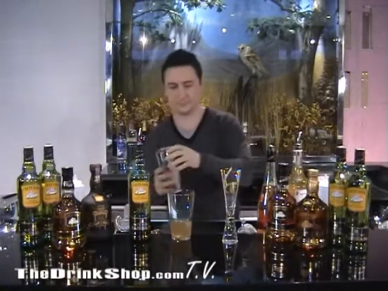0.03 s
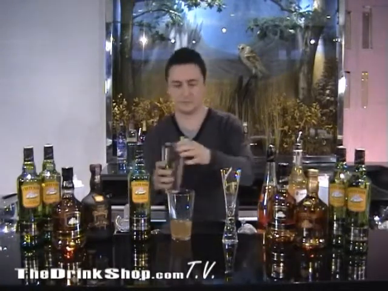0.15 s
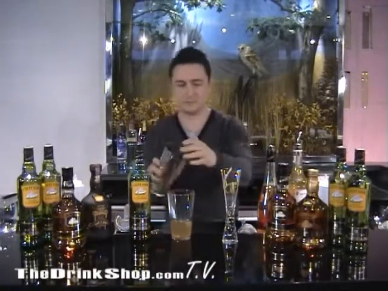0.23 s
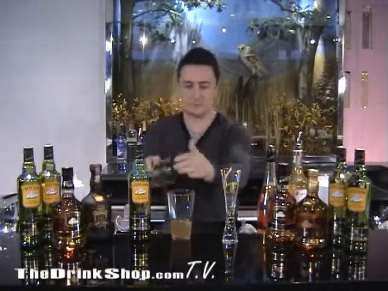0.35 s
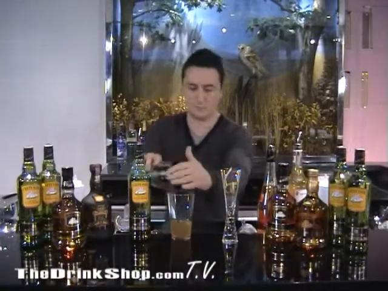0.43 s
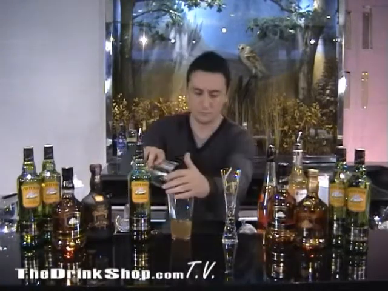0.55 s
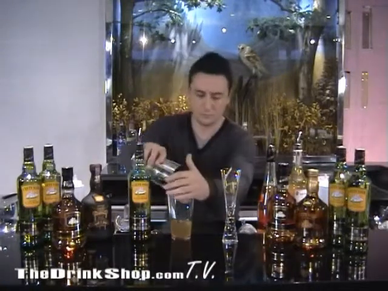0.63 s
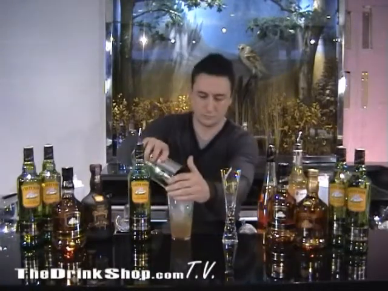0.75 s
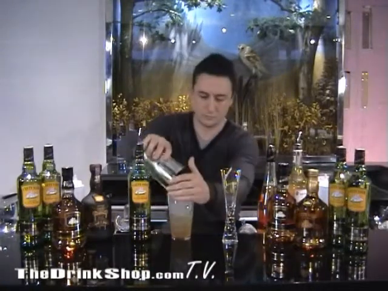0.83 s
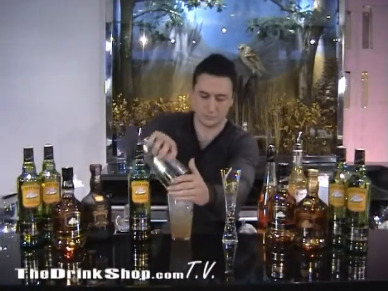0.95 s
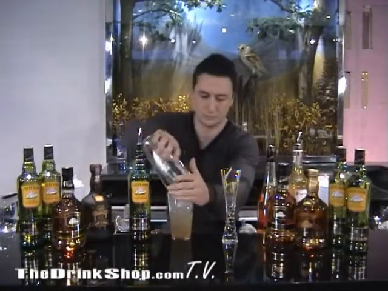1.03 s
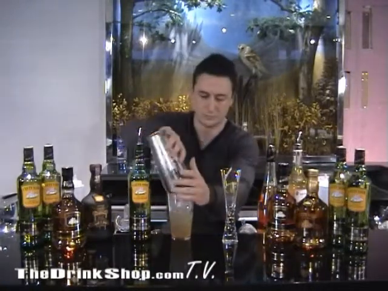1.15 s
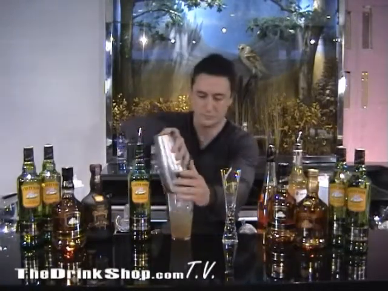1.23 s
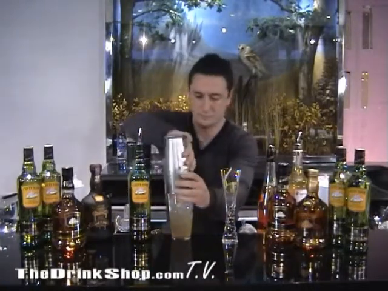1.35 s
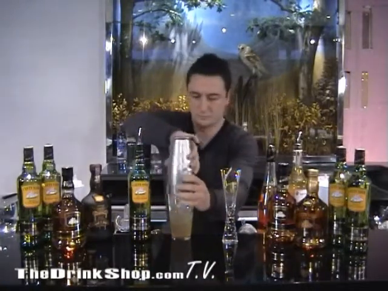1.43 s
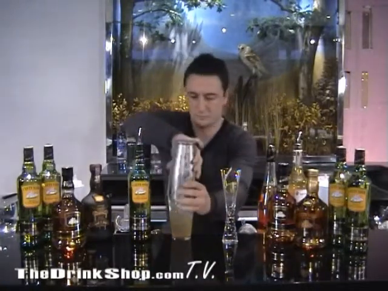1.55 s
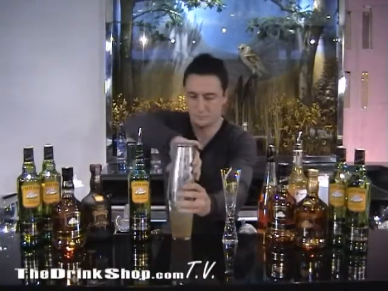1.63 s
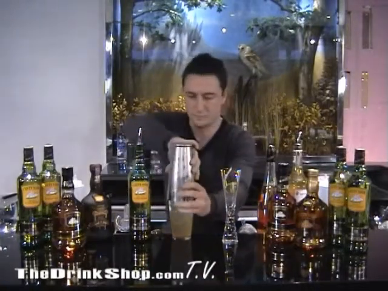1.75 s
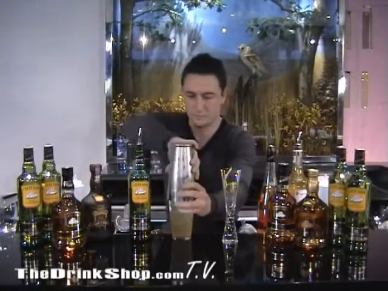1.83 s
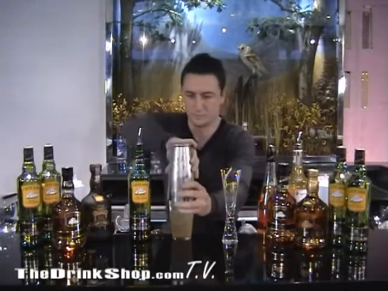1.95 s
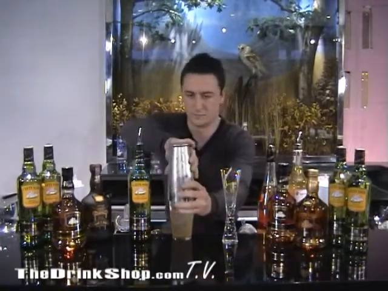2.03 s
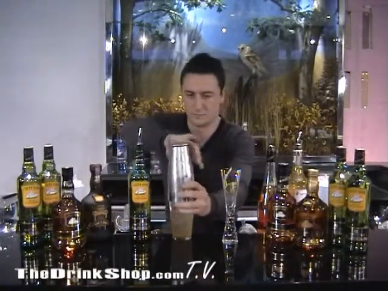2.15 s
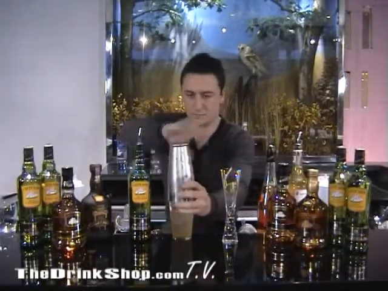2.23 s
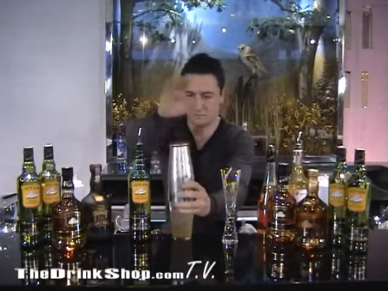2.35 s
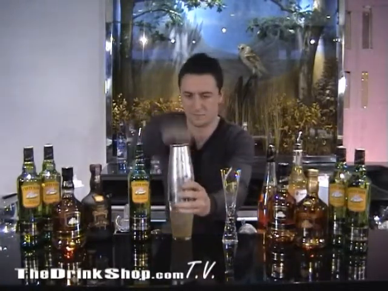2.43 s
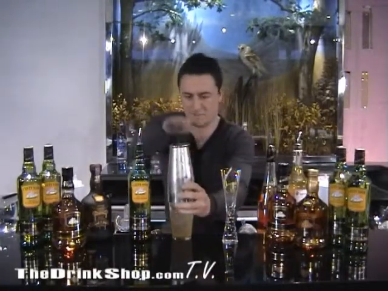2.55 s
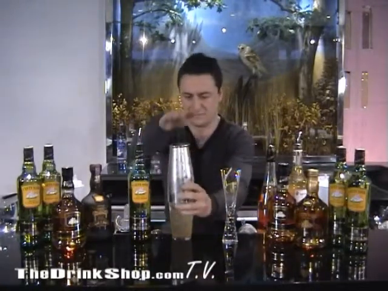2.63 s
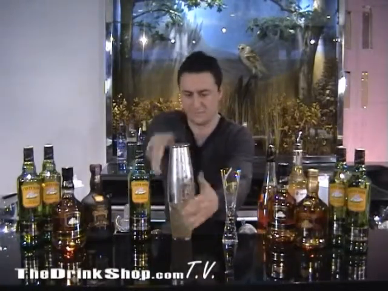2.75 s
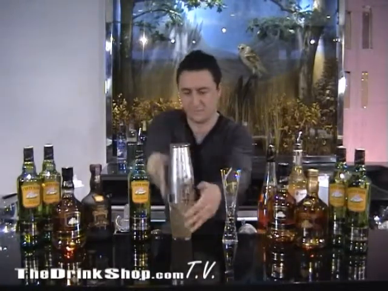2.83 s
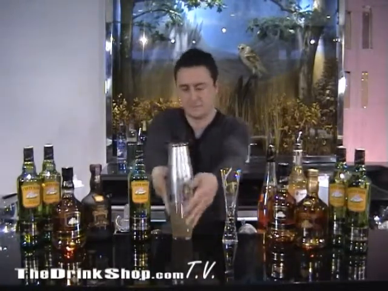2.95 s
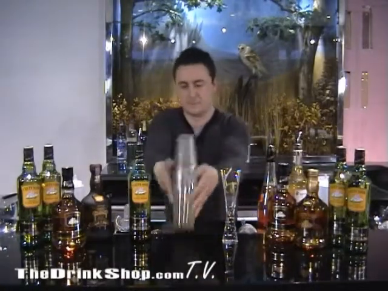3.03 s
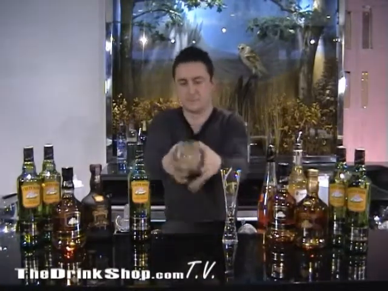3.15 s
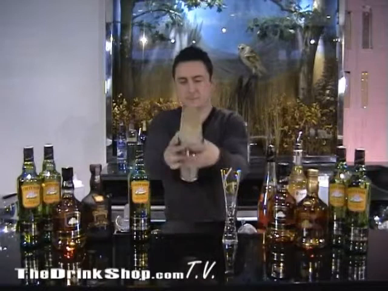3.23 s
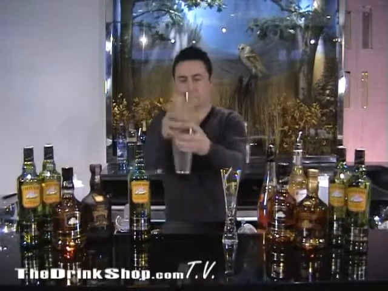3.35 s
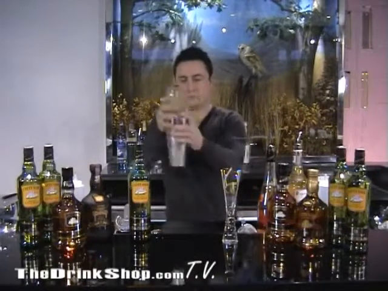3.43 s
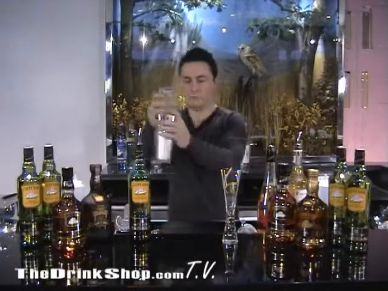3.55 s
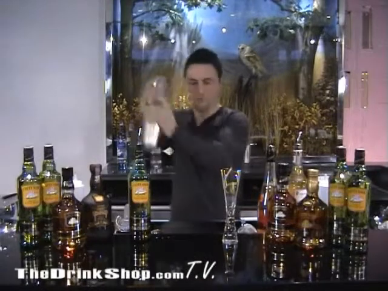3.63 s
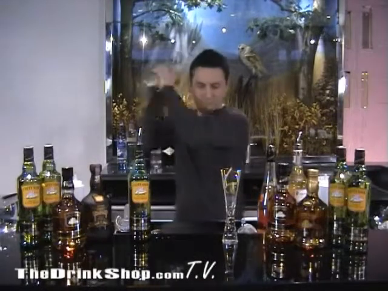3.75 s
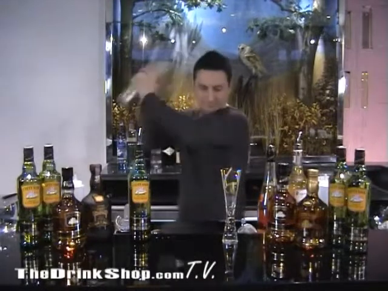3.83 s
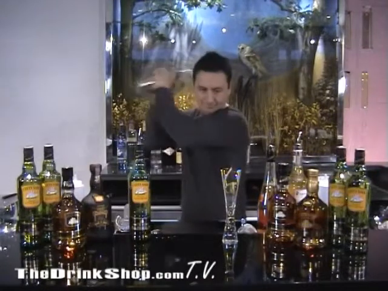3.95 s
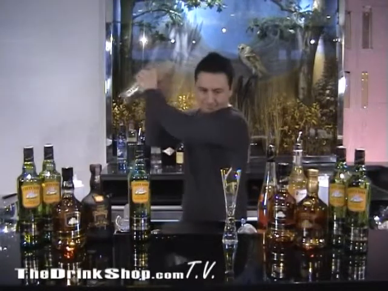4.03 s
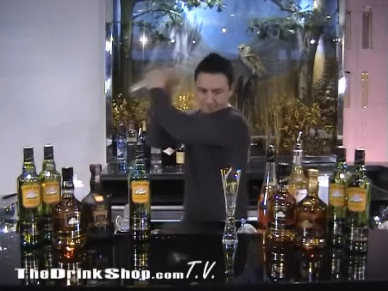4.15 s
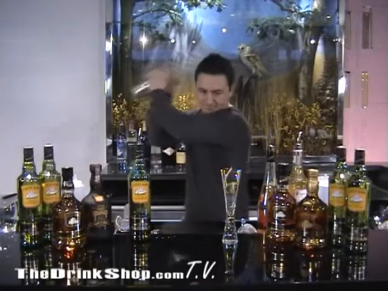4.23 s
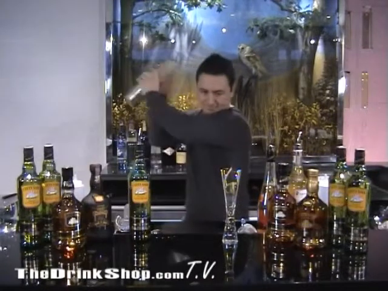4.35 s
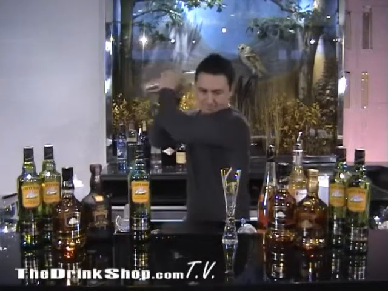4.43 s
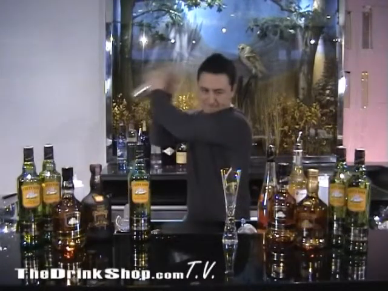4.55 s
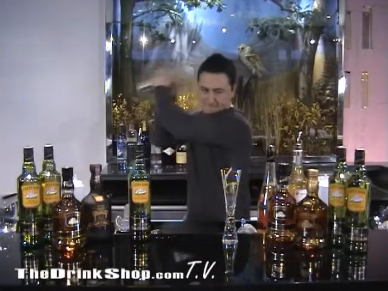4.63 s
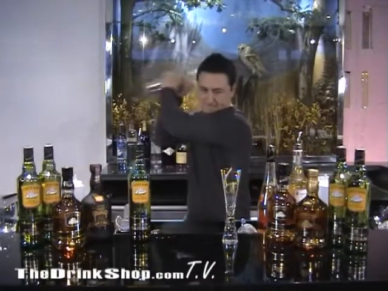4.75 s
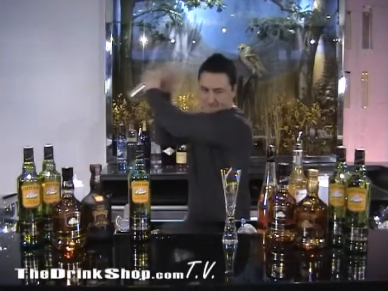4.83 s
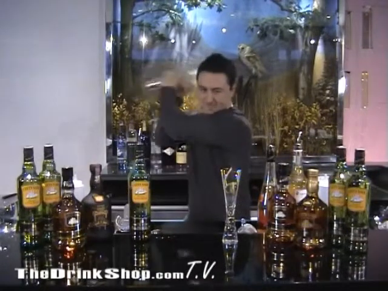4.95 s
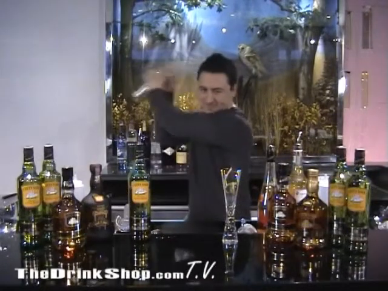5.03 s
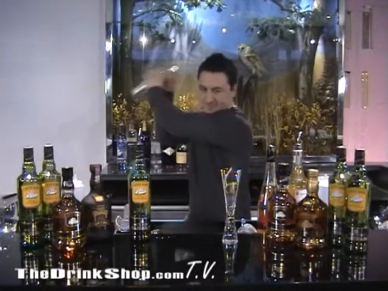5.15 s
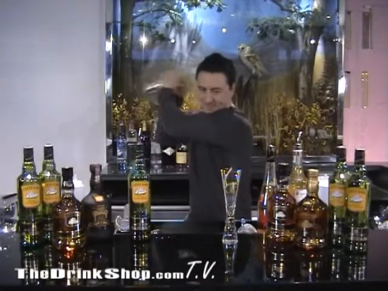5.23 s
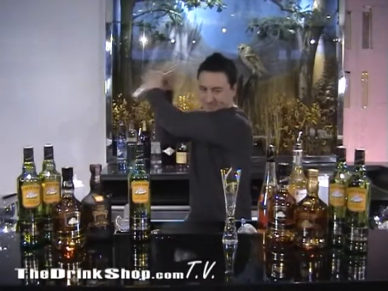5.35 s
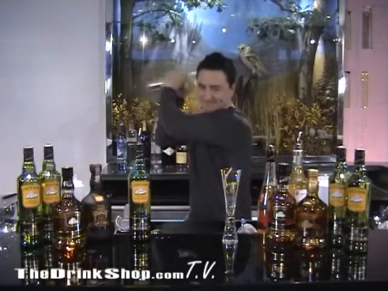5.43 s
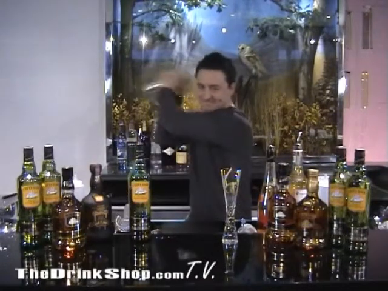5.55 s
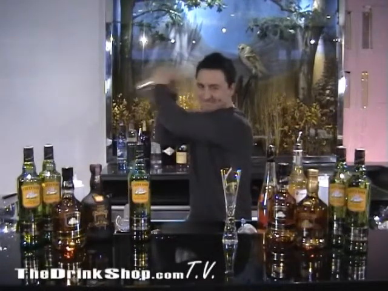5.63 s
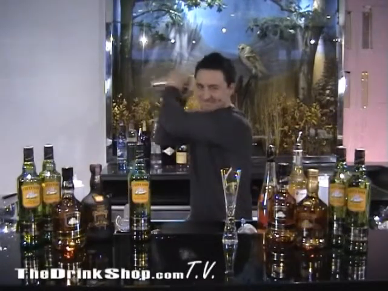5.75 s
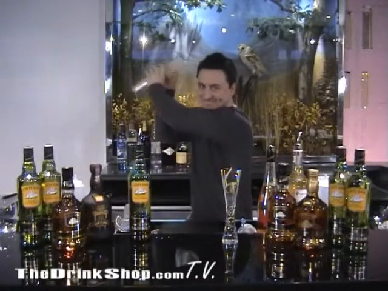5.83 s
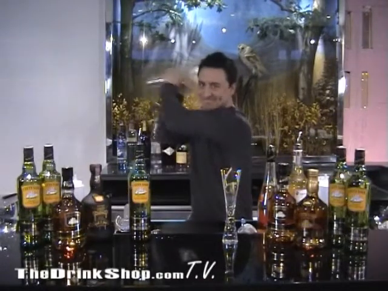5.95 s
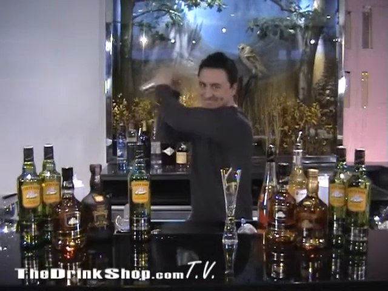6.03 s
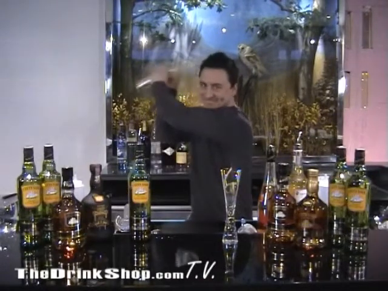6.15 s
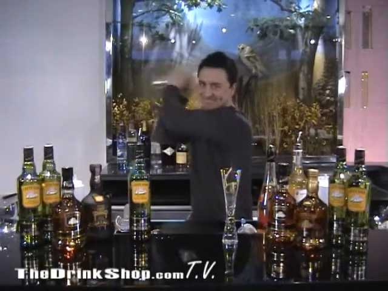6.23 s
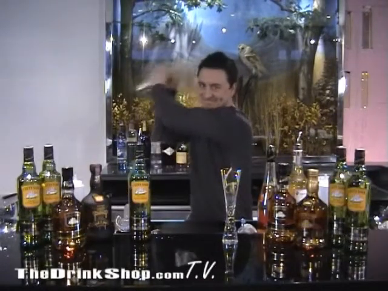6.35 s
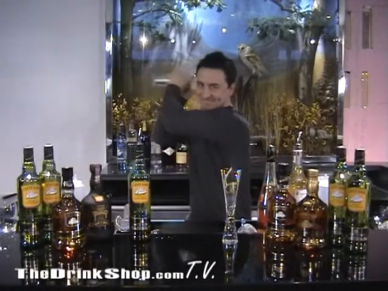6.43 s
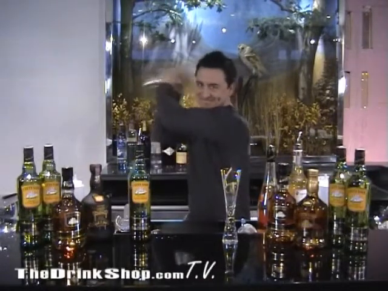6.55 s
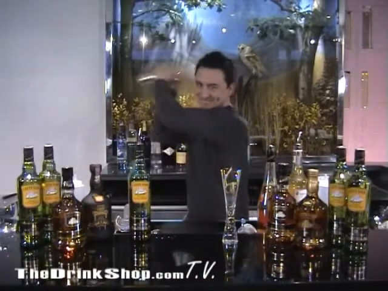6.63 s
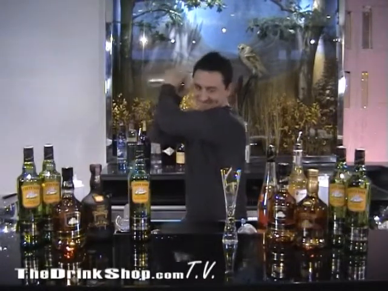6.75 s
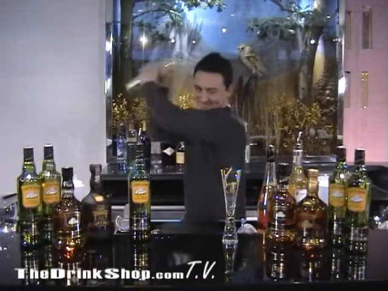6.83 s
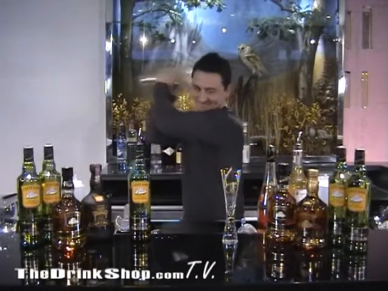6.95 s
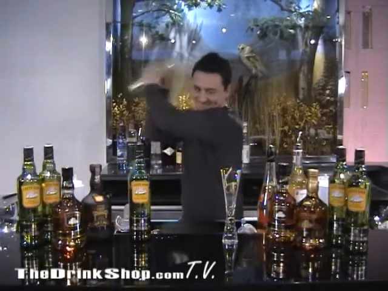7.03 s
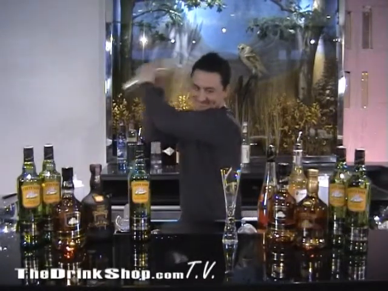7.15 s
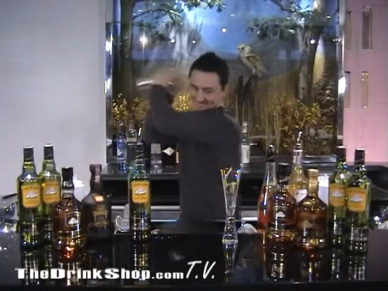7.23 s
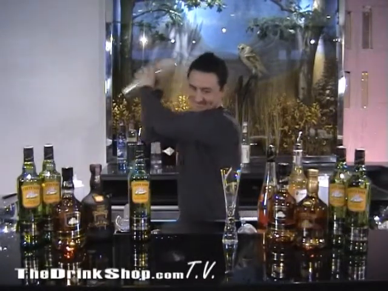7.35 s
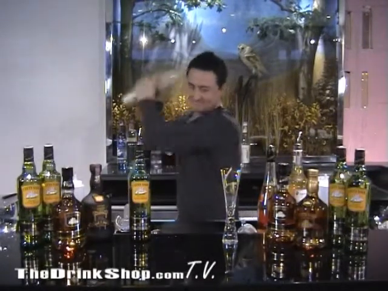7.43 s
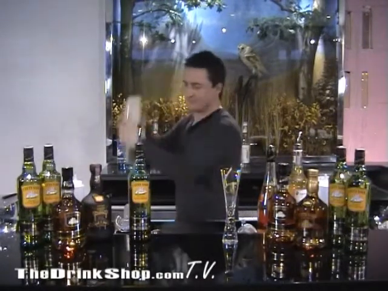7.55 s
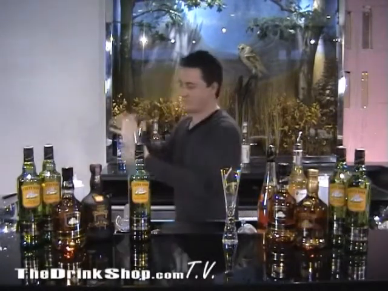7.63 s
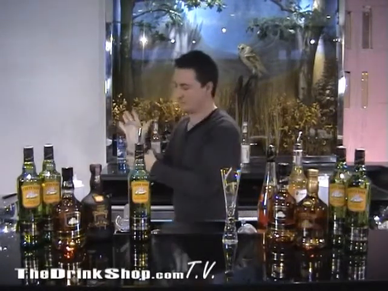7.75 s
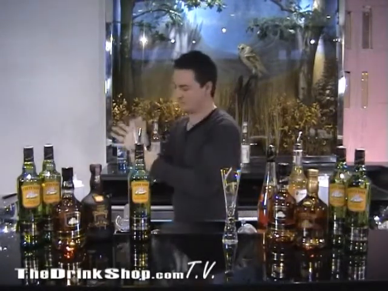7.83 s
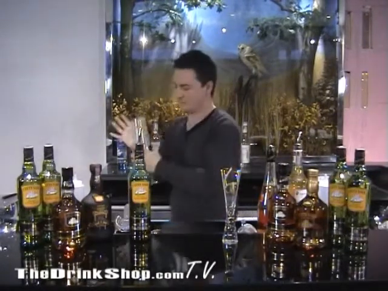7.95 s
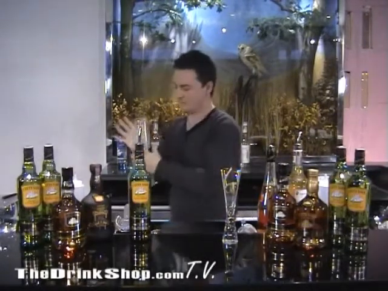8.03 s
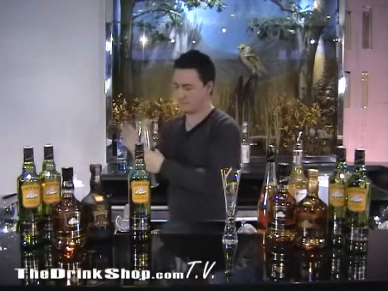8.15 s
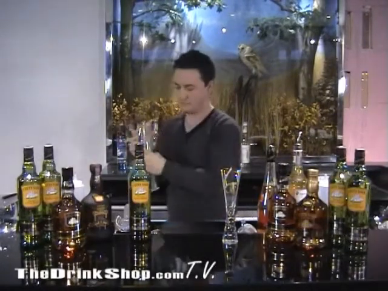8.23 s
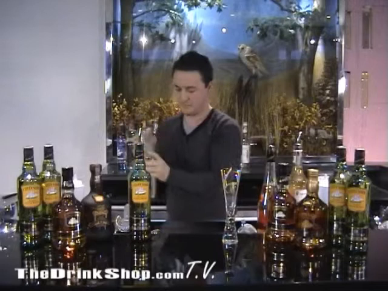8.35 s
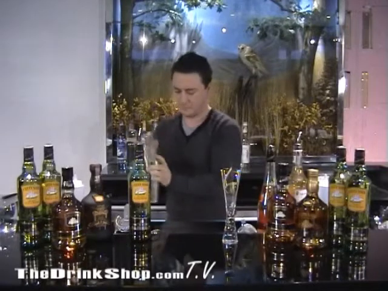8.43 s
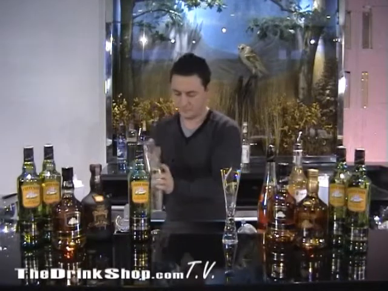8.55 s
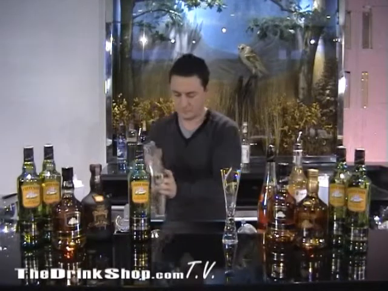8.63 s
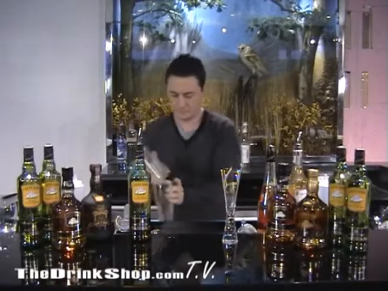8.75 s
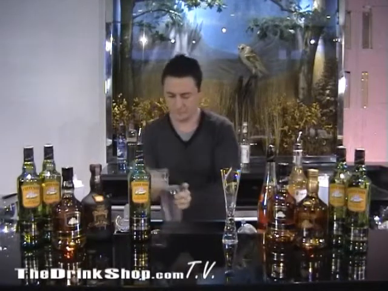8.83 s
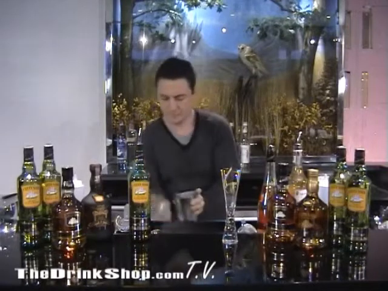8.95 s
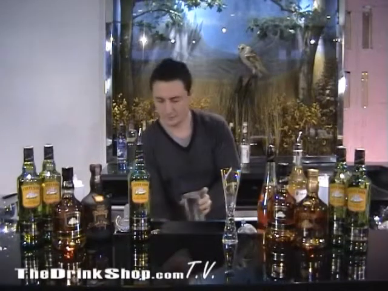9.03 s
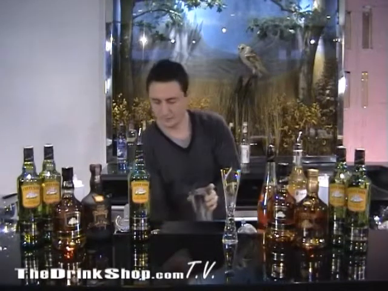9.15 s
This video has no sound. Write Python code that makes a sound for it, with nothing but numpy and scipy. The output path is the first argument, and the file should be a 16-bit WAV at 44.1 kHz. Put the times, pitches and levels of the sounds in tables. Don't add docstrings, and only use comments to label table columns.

```python
import sys
import numpy as np
from scipy import signal
from scipy.fft import rfft, irfft
from scipy.io import wavfile
from scipy.ndimage import uniform_filter1d

SR = 44100
rng = np.random.default_rng(int(sys.argv[2]) if len(sys.argv) > 2 else 0)


def pcm_store(signal):
    levels = np.round(np.clip(np.atleast_2d(signal), -1, 1) * 32767)
    wavfile.write(sys.argv[1], SR, levels.astype(np.int16).T)


def volts(x):
    e = np.asarray(x, float) / 20
    return 10 ** e


N = 405719

# ice pack lands on the base in seconds, crack in dB, knock in dB,
# lead of the first cube in seconds, level of that cube in dB.
STROKES = [(3.91, -11.5, -27, 0.019, -24), (4.096, -19, -40, 0.044, -15), (4.2483, -12, -29, 0.02, -32),
           (4.421, -14, -30, 0.054, -13.5), (4.584, -14.5, -48, 0.054, -15),
           (4.755, -30, -32, 0.058, -14.5), (4.9191, -13, -26, 0.039, -17), (5.0545, -17, -38, 0.025, -11),
           (5.2399, -13, -25, 0.031, -15), (5.4115, -13.5, -28.5, 0.042, -16),
           (5.57, -10.5, -30.5, 0.032, -15), (5.7425, -13, -28, 0.063, -14),
           (5.906, -10.5, -31, 0.044, -14), (6.072, -15, -22, .047, -14), (6.2323, -18, -26, 0.036, -15),
           (6.4063, -13.5, -25, 0.046, -17), (6.5739, -11.5, -26, 0.033, -13),
           (6.7445, -13.5, -25.5, 0.056, -11.5), (6.9025, -17.5, -20.5, 0.047, -17),
           (7.077, -16, -29, 0.053, -13), (7.2447, -16, -30, .05, -28), (7.4318, -15, -34, 0.062, -31),
           (7.603, -19, -25, 0.033, -23)]
# start in seconds, peak level in dB, brightest spot in Hz.
LOOSE_CUBES = [(4.1215, -18, 4410), (4.6329, -16, 5900), (4.831, -13.5, 6400), (4.872, -11.5, 5660),
               (5.1032, -14, 2250), (5.282, -10, 2800), (5.3204, -9.5, 4200), (5.6022, -13, 3100),
               (6.151, -15, 3960), (6.2892, -15, 2590), (6.4682, -14, 3230), (6.496, -13, 3110),
               (6.5436, -11, 3180), (6.6119, -16, 2890), (6.64, -15, 6230), (7.1225, -12, 3120),
               (7.2794, -14.5, 6000), (7.3158, -14, 5280), (7.4844, -13, 3180), (7.5752, -16, 2060),
               (7.7095, -14, 2840), (7.7488, -12, 2640)]
# start in seconds, peak level
# in dB, pitch in Hz.
WALL_BLOWS = [(3.7499, -24, 1980), (3.7793, -20, 1850), (3.895, -18, 1610), (3.9404, -19, 1976),
              (3.9943, -16.5, 1904), (4.0636, -19, 1680), (4.0941, -17.5, 1644), (4.136, -20, 1650),
              (4.1779, -16, 1630), (4.2208, -18, 1696), (4.2497, -14, 1750), (4.3216, -19, 1940),
              (4.3704, -22, 1790), (4.4228, -14, 1955), (4.5066, -17, 1830), (4.556, -12.5, 1690),
              (4.6877, -19, 1800), (4.7027, -18, 1740), (4.7341, -14, 1720), (4.8159, -19, 1870),
              (4.8703, -17, 1770), (5.0444, -22, 1780), (5.0654, -18, 1725), (5.1472, -20, 1690),
              (5.1936, -24, 1860), (5.3692, -16, 1740), (5.4136, -17, 1740), (5.4849, -19, 1730),
              (5.5313, -18, 1760), (5.5727, -15.5, 1840), (5.6411, -20, 1820), (5.663, -20, 1600),
              (5.6979, -16.5, 1634), (5.7503, -18, 1650), (5.8326, -19, 1720), (5.8715, -15, 1670),
              (5.907, -16.5, 1616), (5.9344, -23, 1850), (6.0396, -16, 1790), (6.0701, -23, 1840),
              (6.1579, -18, 1680), (6.2063, -13, 1740), (6.331, -18, 1760), (6.3519, -18, 1690),
              (6.3774, -17, 1850), (6.4013, -21, 1595), (6.5764, -15.5, 1680), (6.6882, -22, 1730),
              (6.7091, -20, 1850), (6.8583, -16, 1714), (6.9022, -18, 1675), (7.0718, -21, 1880),
              (7.1272, -21, 1780), (7.1686, -21, 1740), (7.212, -15, 1700), (7.2439, -18, 1670),
              (7.3911, -17, 1693), (7.4225, -21, 1870), (7.6295, -23, 1595), (7.6545, -19, 1890),
              (3.2908, -25, 1940), (3.3082, -23, 1860), (3.3402, -20, 1960), (3.3979, -22, 1760),
             (3.4216, -21, 1670), (3.5088, -25, 1960), (3.5669, -25, 1730), (3.6054, -23, 1880),
             (4.918, -22, 1754), (4.96, -26, 1780), (5.0, -23, 1720), (5.085, -15.5, 1770)]
# start in seconds, peak level in dB, brightest spot in Hz.
TIP_HITS = [(3.2915, -21, 3050), (3.308, -15, 3180), (3.327, -23, 2800), (3.3366, -13, 3120),
            (3.3739, -7, 4080), (3.389, -10, 5000), (3.3993, -11, 4870), (3.4223, -13, 4400),
            (3.4312, -12, 5200), (3.465, -19, 3110), (3.483, -17, 2950), (3.4916, -15, 5000),
            (3.4991, -19, 5430), (3.5284, -13.5, 5200), (3.566, -20.5, 4480), (3.5904, -21, 4400),
            (3.7345, -18, 7400), (3.7524, -19, 6560), (3.7776, -9, 4350)]
# start in seconds, peak level in dB.
TICKS = [(3.7936, -8), (3.911, -6), (3.9784, -19), (4.05, -13), (4.0967, -17), (4.2189, -19), (4.2279, -13),
         (4.2493, -14), (4.3097, -19), (4.3243, -12), (4.3365, -14), (4.4214, -12), (4.5052, -19),
         (4.5315, -18), (4.584, -13), (4.6329, -22), (4.6993, -21), (4.831, -22), (4.8674, -22),
         (4.9188, -20), (4.9956, -14), (5.0305, -16), (5.0804, -13), (5.2176, -25), (5.2391, -19),
         (5.3194, -17), (5.3663, -21), (5.4112, -16), (5.4336, -20), (5.6022, -10), (5.6945, -17),
         (5.7429, -18), (5.8641, -14), (5.8921, -21), (5.942, -14), (5.9913, -16), (6.0245, -15),
         (6.1974, -22), (6.2317, -12.5), (6.2892, -19), (6.4054, -19), (6.4383, -16), (6.4683, -14),
         (6.495, -12), (6.5336, -16), (6.581, -18), (6.6399, -20), (6.6803, -19), (6.7392, -21),
         (6.8514, -22), (6.9018, -16), (7.0719, -16), (7.1228, -16), (7.2096, -15), (7.2804, -16),
         (7.2929, -16), (7.3158, -13), (7.3732, -17), (7.5753, -20), (7.6097, -14)]
# start in seconds, peak level in dB.
FIRST_SLIDES = [
    (3.1615, -44),
    (3.207, -45),
    (3.229, -39),
    (3.264, -32),
    (3.292, -31),
]
# start in seconds, peak level in dB, pitch in Hz.
TURN_KNOCKS = [
    (3.374, -23.5, 1055),
    (7.745, -31, 605),
]

# start in seconds, peak level in dB, lows in relative dB,
# highs in relative dB, brightest spot in Hz if there is one.
TIN_KNOCKS = [
    (0.179, -34, -9.5, -45, 3050),
    (0.264, -22, -11, -11),
    (0.3245, -20, -10.5, -14),
    (0.3581, -31, -15, -1),
    (0.4131, -7.5, -10, -12),
    (0.4835, -11.5, -6, -22, 3050),
    (0.505, -22, 9, -40),
    (0.5491, -39, 14, 10),
]
# start in seconds, peak level in dB, lows and highs in relative dB.
GLASS_HITS = [(0.633, -12.5, -10, -14), (0.6589, -11.5, -22, -19), (0.674, -21, -22, -17),
              (0.6794, -16, -27, -22), (0.692, -16, -18, -21), (0.7327, -17.5, -23, -7),
              (0.7706, -12.5, -13, -12), (0.7981, -22, 0, -13), (0.8269, -23, -17, -12),
              (0.8394, -22, -15, -6), (0.858, -17, -13, -11), (0.8932, -23, -20, -7),
              (0.9526, -24, -20, -14), (0.9607, -14, -29, -23), (1.0279, -27, -15, -14)]
# start in seconds, peak level in dB, lows and highs in relative dB.
SEAT_HITS = [
    (1.2939, -20.5, -10, -9),
    (1.3022, -19.5, -8.5, -14),
    (1.344, -29.5, 2, -15),
    (1.431, -22, -9.5, -24),
]
# start in seconds, peak level in dB, lows and highs in relative dB.
RIM_HITS = [
    (1.4745, -19, -6.5, -17),
    (1.4844, -17.5, -5, -19),
    (1.5294, -29, 0, -17),
    (1.6194, -36, 0, -25),
]
# start in seconds, peak level in dB, lows in relative dB, highs in relative dB,
# brightest spot in Hz if there is one.
HAND_BLOWS = [(1.829, -57, 24, -23), (2.026, -57, 20, -23), (2.4589, -4.5, -19, -5.5),
              (2.8345, -33, -1.5, -4.5), (2.855, -28, -8, -24, 2300), (2.904, -21, 0, -28, 2100),
              (2.9191, -25, 1, -28, 1800), (3.0525, -38, 0, -13), (3.105, -40, -7, -23),
              (7.828, -7.5, -18, -13), (8.007, -15, -21, -16, 4400), (8.022, -11.5, -13, -18),
              (8.0355, -12, -30, -14), (8.0575, -22, -8, -20), (8.144, -27, -25, -23),
              (8.597, -38, -12, -21)]
# start in seconds, peak level in dB, lows and highs in relative dB.
CLINKS = [
    (8.7001, -41, -8, -30),
    (8.7999, -24, -1, -13),
    (8.8975, -33.5, -14, -20),
    (8.9194, -40, -11, -8),
    (8.964, -45, -10, 7),
]
# start in seconds, peak level in dB, pitch in Hz.
POUR_KNOCKS = [
    (0.497, -24.5, 720),
    (0.664, -26, 720),
    (0.808, -19.5, 804),
    (0.878, -30, 900),
]
# start in seconds, peak level in dB, pitch in Hz.
THUDS = [
    (8.469, -36, 440),
    (8.496, -30.5, 335),
    (8.519, -37, 329),
    (8.603, -39, 334),
    (8.699, -39, 365),
    (8.724, -35.5, 318),
]
# start in seconds, peak level in dB, brightest spot in Hz.
DRIPS = [
    (8.411, -36, 5000),
    (8.424, -43, 4500),
    (8.487, -44, 5500),
    (8.521, -44, 4000),
    (9.147, -41, 5200),
]

# effort points (time in seconds, level in dB), then lows, clatter and
# highs in relative dB.
POUR = [
    ([(0.1, -58.5), (0.482, -38), (0.62, -41.5)], (3.9, 3.6, -4)),
    ([(0.635, -33), (0.945, -33), (1.15, -57)], (0.91, 0.2, -15.5)),
]
SHAKE = [
    ([(3.2, -73.5), (3.29, -44), (3.41, -33), (3.5, -36), (3.72, -42)], (-17, 5.6, -7)),
    ([(3.78, -27.5), (4.1, -29.5), (6.08, -29), (6.13, -33.5), (6.18, -29.5), (7.3, -28.5), (7.565, -35.5), (7.58, -26.5), (7.7, -29)], (-11.5, 2.8, -6.5)),
    ([(7.74, -28.5), (7.79, -29)], (0, 2.2, -11)),
    ([(7.83, -28), (7.92, -31.5), (8.0, -36), (8.08, -34.5), (8.25, -58)], (-9, 4.3, -10.5)),
]
LIFT = [
    ([(8.28, -60), (8.38, -55), (8.45, -61)], (2.9, 5.9, 0.5)),
    ([(7.8, -57)], (16, 0.2, -7)),
    ([(8.61, -66), (8.7, -49), (8.79, -58), (8.9, -60), (9.05, -74)], (3.5, -7, -9)),
]

# pitch in Hz, level in dB, decay by 60 dB in seconds.
TIN = [(740, -12, 0.034), (3100, -3, 0.038), (4710, -5.5, 0.035), (5320, -7, .03), (7400, 5, 0.03),
       (9000, 3, 0.03)]
GLASS = [(480, -13, 0.14), (790, -8, 0.029), (1920, -5, 0.033), (2007, -4.5, 0.031), (4280, -7, 0.04),
         (4360, -4, 0.033), (5430, -9, 0.025), (7280, 9, 0.028), (8100, -9, 0.055), (11000, -4, .035),
         (12200, -12, 0.027)]
SEAT = [(778, -7, 0.16), (4450, -1, .03), (4880, 0.5, .03), (7300, 7, 0.038), (7700, 0, .03),
        (11000, -1, 0.028)]
RIM = [(826, -4, 0.22), (2090, -8, 0.1), (2255, -1.5, .05), (2960, -2, 0.27), (4350, -7, 0.12),
       (5006, -12, 0.15), (5362, -12, .15), (7488, -6, 0.12), (10900, -5, .1)]
PALM = [(224, 3, 0.064), (340, -16, 0.056), (670, 8.5, 0.023)]
SEALED = [(1040, -10, 0.03), (1600, -7, 0.033), (1680, -6.5, 0.029), (1780, -3.5, 0.015),
          (1828, -11, 0.091), (1903, -9.5, 0.06), (2856, -11.5, 0.018), (3146, -10.5, 0.014),
          (5280, -13, 0.016), (6230, -18, 0.041)]
WALL = [(1870, 0, 0.069), (3050, 3, .05), (3780, 0, 0.076)]
EMPTY_GLASS = [(845, -9, 0.2), (1953, -0.5, 0.15), (2080, 2.5, 0.056), (4290, -2, 0.053),
               (5670, -1.5, 0.05), (7150, -3, 0.069)]

# frequency in Hz, level in dB per Hz.
POUR_COLOUR = [(88, -43), (150, -2), (464, -0.5), (583, -5.5), (777, 5), (1410, -10), (1980, -13),
               (3200, 2), (7280, -13), (14500, -42)]
SHAKE_COLOUR = [(88, -57), (150, -5.5), (310, -47), (491, -2.5), (606, -15.5), (978, -6), (1180, -13.5),
                (1700, -5), (2100, -8.5), (3140, -7.5), (6250, -6.5), (12000, -22), (14500, -56)]
SLAP_COLOUR = [(35, -63), (60, -29), (219, -2.5), (350, -3.5), (577, -7.5), (679, 0), (895, -7), (1700, -6),
               (5950, -20.5), (11900, -44), (15000, -75)]
BAR_COLOUR = [(15, -55), (25, -37), (45, -16), (225, -3), (414, -8), (584, 2), (684, -61), (761, -8.5),
              (916, -11), (1640, -13.5), (1780, -13), (2310, -14), (2940, -18.5), (9660, -32.5),
              (14000, -52)]
# time in seconds, level in dB, pitch in Hz.
RUMBLE = [
    (4.9, -76, 75),
    (5.1, -59, 75.3),
    (5.7, -64, 79),
    (6.1, -68, 95),
    (6.9, -62, 99),
    (7.4, -82, 95),
]
# frequency in Hz, decay by 60 dB in seconds.
ROOM_T60 = [(150, 0.83), (600, 0.66), (2000, 0.62), (6000, 0.72), (13000, 0.2)]
# frequency in Hz, level in dB against the direct sound.
ROOM_DB = [(150, -3.5), (600, -0.5), (2000, -2), (6000, -8), (13000, -4.5)]
# frequency in Hz, side minus mid in dB.
SIDE_DB = [(31, -8), (62, -7.5), (240, -14), (1050, -8), (4100, -9.5), (12500, -3)]
# frequency in Hz, left minus right in dB.
BALANCE_DB = [(30, 2), (125, -2.5), (400, -2.5), (1000, -2), (2000, 2.5), (4000, 1.7), (12000, 1)]
# start in seconds, step in dB, hold in seconds, creep back in seconds.
DUCKS = [
    (2.461, -21, 0.036, 0.4),
    (3.36, -10.5, 0.038, 0.39),
    (3.76, -7.5, 2.7, 1.46),
    (3.0, 0.7, 0.17, .2),
    (8.2, 1, 0.49, 0.45),
]

PACK_HZ, FIRST_CUBE_HZ, BASE_HZ = 3820, 3304, 1055
SPOT_SCATTER, KNOCK_SCATTER = 0.161, 0.108
LOOSE_DB, WALL_BLOW_DB, SPOT_RING_DB, SPOT_RING_S = -4, -3.5, -9.5, 0.0031
TICK_DB, TICK_S = -2, 0.00035
SLAP_S, SLAP_DB, SLAP_LENGTH_S = 2.4585, -15.5, 0.02
SCUFF_S, SCUFF_FADE_S, SCUFF_DB, SCUFF_HZ = 2.836, 0.14, -52, 8000
WET_GLASS_DAMP = 0.6
KNOCK_ROOM_DB, ROOM_PLACES = -6.5, 10
BAR_DB, RUMBLE_WOBBLE = -49, 0.55
REST_DB = 3
OPENING_S, OPENING_DB = 0.47, -4
CEILING = 0.5


def on_axis(points, hz):
    f, v = np.transpose(points)
    return np.interp(np.log(hz), np.log(f), v)


def over_time(rows):
    s, *columns = np.transpose(rows)
    return [np.interp(np.arange(N) / SR, s, c) for c in columns]


def band(x, hz, octaves):
    edges = [hz * 2 ** (-octaves / 2), min(hz * 2 ** (octaves / 2), 0.45 * SR)]
    return signal.sosfilt(signal.butter(2, edges, "band", fs=SR, output="sos"), x)


def high_pass(x, hz):
    return signal.sosfilt(signal.butter(3, hz, "high", fs=SR, output="sos"), x)


def unit(x):
    return x / np.sqrt(np.mean(x ** 2))


def walk(per_s):
    k = int(SR / per_s)
    held = np.repeat(rng.standard_normal(N // k + 1), k)[:N]
    return unit(uniform_filter1d(held, k))


def shaped(x, points):
    return irfft(rfft(x) * volts(on_axis(points, np.fft.rfftfreq(N, 1 / SR) + 1)), N)


def strokes():
    s, crack_db, knock_db, ahead_s, ahead_db = np.transpose(STROKES)
    chance = rng.standard_normal((len(s), 3)).T
    first_hz = FIRST_CUBE_HZ * np.exp(SPOT_SCATTER * chance[0])
    pack_hz = PACK_HZ * np.exp(SPOT_SCATTER * chance[1])
    base_hz = BASE_HZ * np.exp(KNOCK_SCATTER * chance[2])
    strays = [(t, db + LOOSE_DB, hz) for t, db, hz in LOOSE_CUBES]
    cracks = [*zip(s - ahead_s, ahead_db, first_hz), *zip(s, crack_db, pack_hz), *strays]
    landings = [*zip(s + 0.00299, knock_db, base_hz)]
    return cracks, landings


def blows(rows, modes, ring_db, crack_s, scatter_db, rise_s=0.000063, split=0.014):
    out = np.zeros(N + SR)
    t = np.arange(int(SR * (np.max(modes, axis=0)[2] + 12 * crack_s))) / SR
    hz, mode_db, t60 = (c[:, None] for c in np.transpose(modes))
    decay = np.exp(-np.log(1000) * t / t60)
    swell = 1 - np.exp(-(t / rise_s) ** 2)
    for s, peak_db, low_db, high_db, *spot_hz in rows:
        noise = rng.standard_normal(len(t))
        chance = rng.standard_normal((3, len(modes), 1))
        burst = noise * swell * np.exp(-t / crack_s)
        middle = band(burst, spot_hz[0], 1.1) if spot_hz else band(burst, 2800, 2.2)
        parts = [band(burst, 740, 2.56), middle, band(burst, 6620, 1.0)]
        crack = sum(volts(db) * p / np.max(np.abs(p)) for p, db in zip(parts, (low_db, 0, high_db)))
        tilt_db = on_axis([(600, low_db), (2000, 0.012), (5000, 0), (8500, high_db)], hz)
        size = volts(ring_db + mode_db + tilt_db + scatter_db * chance[0])
        pair = sum(np.sin(2 * np.pi * hz * (1 + split * c) * t) for c in chance[1:])
        ring = swell * (size * decay * pair).sum(axis=0)
        i = int(s * SR)
        out[i:i + len(t)] += volts(peak_db) * (crack + ring)
    return out[:N]


def stages(table):
    return [[(s, db, *mix) for s, db in effort] for effort, mix in table]


def rattle(rows, colour, modes, per_s, spread_db, smear_s, ring_db, slosh, clump_db, rings_s):
    rows = np.concatenate(rows)
    level_db, low_db, mid_db, high_db = over_time(rows)
    t = np.arange(N) / SR
    strength = volts(spread_db * np.minimum(rng.exponential(size=N), 2.4))
    hit = (rng.random(N) < per_s / SR) * strength
    hit = signal.lfilter([1], [1, -np.exp(-1 / (smear_s * SR))], hit)
    effort = unit(hit) + slosh
    groups, edges_hz = np.zeros((4, N)), [1350, 2350, 7000]
    for hz in 180 * 2 ** np.arange(0, 6.4, 1 / 3):
        clump = volts(on_axis(colour, hz) + clump_db * walk(40))
        groups[np.searchsorted(edges_hz, hz)] += clump * band(effort * rng.standard_normal(N), hz, 0.54)
    size = np.std(groups, axis=1)
    free = (t > rings_s[0]) & (t < rings_s[1])
    for hz, db, t60 in modes:
        r = np.exp(-np.log(1000) / (t60 * SR))
        drive = effort * rng.standard_normal(N) * volts(clump_db * walk(25)) * free
        ring = signal.lfilter([1, 0, -1], [1, -2 * r * np.cos(2 * np.pi * hz / SR), r * r], drive)
        k = np.searchsorted(edges_hz, hz)
        groups[k] += volts(ring_db + db) * unit(ring) * size[k]
    gate = (t > rows[0][0]) & (t < rows[-1][0])
    mix = sum(volts(db) * unit(g) for g, db in zip(groups, (low_db, 0, mid_db, high_db)))
    return gate * volts(level_db) * mix


def thuds(rows, decay_s, rough):
    out, t = np.zeros(N + SR), np.arange(SR // 4) / SR
    for s, db, hz in rows:
        i = int(s * SR)
        out[i:i + len(t)] += volts(db) * np.exp(-t / decay_s) * np.sin(2 * np.pi * hz * t)
    return out[:N] * (1 + rough * unit(band(rng.standard_normal(N), 197, 1.48)))


def ticks():
    s, db = np.transpose(TICKS)
    hit = np.zeros(N)
    hit[(s * SR).astype(int)] = volts(db)
    burst = signal.lfilter([1], [1, -np.exp(-1 / (TICK_S * SR))], hit) * np.sign(rng.standard_normal(N))
    return volts(TICK_DB) * 2 * band(burst, 5200, 1.7)


def shaken_ice(cracks):
    slips = [(s, db, -20, -9) for s, db in FIRST_SLIDES]
    sliding = [(s, db, -25, -7, hz) for s, db, hz in TIP_HITS]
    cubes = [(s, db, -24, -17, hz) for s, db, hz in cracks]
    clatter = rattle(stages(SHAKE), SHAKE_COLOUR, SEALED, per_s=650, spread_db=2.0, smear_s=0.0015,
                     ring_db=-2.0, slosh=0.65, clump_db=1.97, rings_s=(3.26, 7.7))
    return (blows(slips, WALL, ring_db=-9, crack_s=0.002, scatter_db=1.0, rise_s=0.001)
            + blows(sliding, SEALED, ring_db=-27.5, crack_s=0.0044, scatter_db=6.0)
            + blows(cubes, SEALED, ring_db=-16, crack_s=0.0055, scatter_db=5, rise_s=0.0012)
            + volts(SPOT_RING_DB) * thuds(TIP_HITS + cracks, decay_s=SPOT_RING_S, rough=0.5)
            + volts(WALL_BLOW_DB) * thuds(WALL_BLOWS, decay_s=0.0087, rough=0.41)
            + volts(-4.0) * clatter + ticks())


def poured_ice():
    wet_glass = [(hz, db, t60 * WET_GLASS_DAMP) for hz, db, t60 in GLASS]
    clatter = rattle(stages(POUR), POUR_COLOUR, wet_glass, per_s=300, spread_db=1.5, smear_s=0.0015,
                     ring_db=-10.0, slosh=0.41, clump_db=2.5, rings_s=(0.63, 1.1))
    return (blows(TIN_KNOCKS, TIN, ring_db=-12.0, crack_s=0.0072, scatter_db=1.5)
            + blows(GLASS_HITS, GLASS, ring_db=-13, crack_s=0.0015, scatter_db=4.0, split=0.023)
            + volts(-3) * clatter)


def seated_tin():
    return (blows(SEAT_HITS, SEAT, ring_db=-13.5, crack_s=0.0028, scatter_db=3.0, split=0.02)
            + blows(RIM_HITS, RIM, ring_db=-17.5, crack_s=0.0079, scatter_db=-1.0, split=0.006))


def slap():
    t = np.arange(N) / SR - SLAP_S
    shudder = volts(-8.5) * np.exp(-np.abs(t) / 0.12)
    contact = np.where(t < SLAP_LENGTH_S, 1, shudder)
    return volts(SLAP_DB) * (t > 0) * contact * unit(shaped(rng.standard_normal(N), SLAP_COLOUR))


def scuff():
    t = np.arange(N) / SR - SCUFF_S
    hiss = unit(band(rng.standard_normal(N), SCUFF_HZ, 1.0))
    return volts(SCUFF_DB) * (t > 0) * np.exp(-np.abs(t) / SCUFF_FADE_S) * hiss


def lifted_tin():
    drips = [(s, db, -25, -6, hz) for s, db, hz in DRIPS]
    clatter = rattle(stages(LIFT), POUR_COLOUR, EMPTY_GLASS[2:], per_s=290, spread_db=-7, smear_s=0.0043,
                     ring_db=-11.5, slosh=0.64, clump_db=2.2, rings_s=(8.61, 9.0))
    return (blows(CLINKS, EMPTY_GLASS, ring_db=-11, crack_s=0.0017, scatter_db=2.0, split=0.004)
            + blows(drips, WALL, ring_db=-25, crack_s=0.002, scatter_db=2)
            + volts(-3.5) * clatter)


def spread(mid, side, hz):
    return mid + volts(on_axis(SIDE_DB, hz)) * side * np.array([[1], [-1]])


def room_echo():
    t, out = np.arange(1 << 15) / SR, 0
    mid, side = rfft(rng.standard_normal((2, len(t))), axis=1)
    octave = np.log2(np.fft.rfftfreq(len(t), 1 / SR) + 1)
    for hz in 2. ** np.arange(6, 15):
        share = np.maximum(1 - np.abs(octave - np.log2(hz)), 0)
        tail = (1 - np.exp(-t / 0.00096)) * np.exp(-np.log(1000) * t / on_axis(ROOM_T60, hz))
        both = spread(irfft(mid * share), 1.14 * irfft(side * share), hz)
        out = out + volts(on_axis(ROOM_DB, hz)) * tail / np.sqrt(np.sum(tail ** 2)) * both
    return out


def room(x):
    out, step = np.zeros((2, 2 * N)), N // ROOM_PLACES + 1
    for k in range(ROOM_PLACES + 1):
        a, b = max(k - 1, 0) * step, min((k + 1) * step, N)
        share = np.cos(np.pi / 2 * (np.arange(a, b) / step - k))
        wet = signal.fftconvolve((x[a:b] * share)[None], room_echo(), axes=1)
        out[:, a:a + wet.shape[1]] += wet
    return out[:, :N]


def bar():
    out = 0
    for hz in 30 * 2 ** np.arange(0, 9, 1 / 3):
        mid, side = (band(rng.standard_normal(N), hz, 1 / 3) for _ in range(2))
        out = out + volts(on_axis(BAR_COLOUR, hz) + 2.0 * walk(6.5)) * spread(mid, side, hz)
    hum = band(band(rng.standard_normal(N), 219.2, 0.14), 219.2, 0.14)
    return volts(BAR_DB) * (unit(out) + volts(-9.5) * unit(hum))


def rumble():
    db, hz = over_time(RUMBLE)
    slow = signal.butter(2, 7, fs=SR, output="sos")
    wobble = unit(signal.sosfilt(slow, rng.standard_normal(N)))
    drone = volts(db) * (1 + RUMBLE_WOBBLE * wobble) * np.sin(2 * np.pi * np.cumsum(hz) / SR)
    pipe_db = np.interp(np.arange(N) / SR, [0, 0.3, 0.6], [-56, -51, -75])
    return drone + volts(pipe_db) * unit(band(rng.standard_normal(N), 582, 0.1))


def camera_gain():
    t = np.arange(N) / SR
    ducks = sum(db * (t > s) * np.clip(1 - (t - s - hold) / back, 0, 1) for s, db, hold, back in DUCKS)
    return volts(REST_DB + ducks + OPENING_DB * (t < OPENING_S) * t / OPENING_S)


def scene():
    cracks, landings = strokes()
    hand = blows(HAND_BLOWS, PALM, ring_db=-18.0, crack_s=0.0052, scatter_db=6.5) + scuff()
    near = shaken_ice(cracks) + poured_ice() + seated_tin() + hand + lifted_tin()
    near = high_pass(near, 160) + slap()
    knocks = (thuds(THUDS, decay_s=0.025, rough=0.54)
              + thuds(TURN_KNOCKS + landings + POUR_KNOCKS, decay_s=0.011, rough=0.75))
    knocks = high_pass(knocks, 200)
    gain = camera_gain()
    direct = (near + knocks) / gain
    echo = room((near + volts(KNOCK_ROOM_DB) * knocks) / gain)
    return direct + echo + bar() + rumble() / gain


def roll_off(x):
    return signal.sosfilt(signal.butter(12, 16260, fs=SR, output="sos"), x)


def record(dry):
    capsules = []
    for channel, sign in zip(dry, (1, -1)):
        capsules.append(shaped(channel, [(hz, sign * db / 2) for hz, db in BALANCE_DB]))
    x = CEILING * np.tanh(np.array(capsules) * camera_gain() / CEILING)
    x = signal.sosfilt(signal.butter(12, 14200, fs=SR, output="sos"), x)
    return roll_off(x)


dry = scene()
out = record(dry)
pcm_store(out)
```